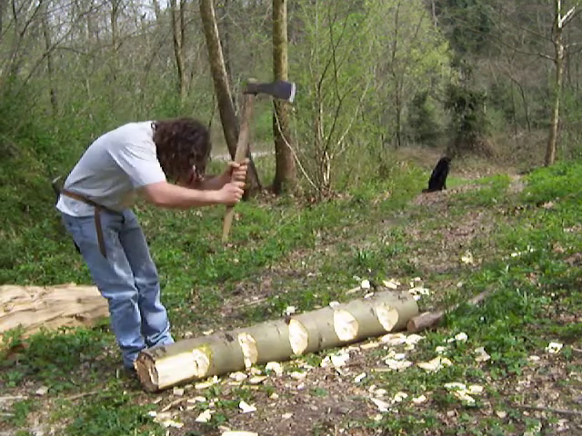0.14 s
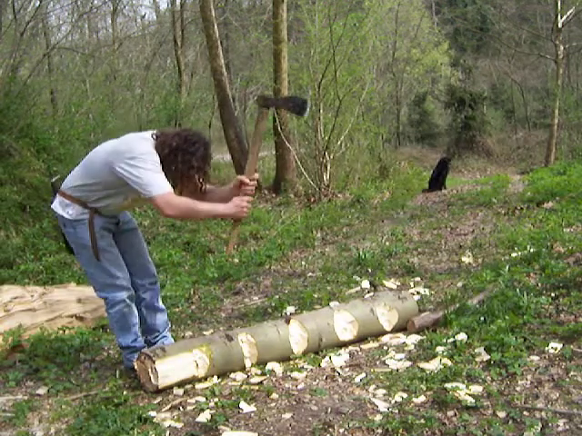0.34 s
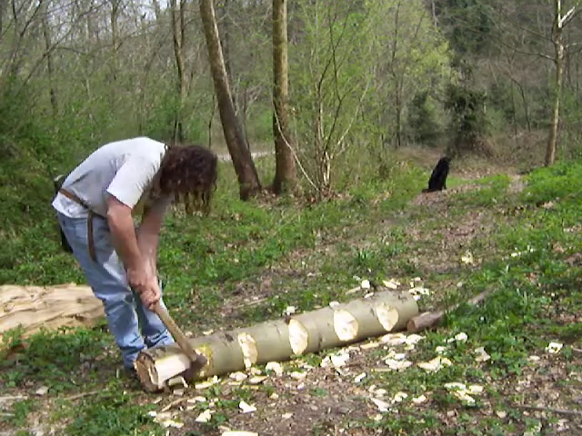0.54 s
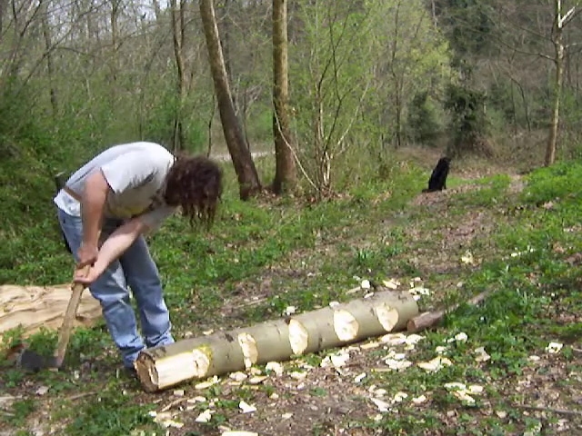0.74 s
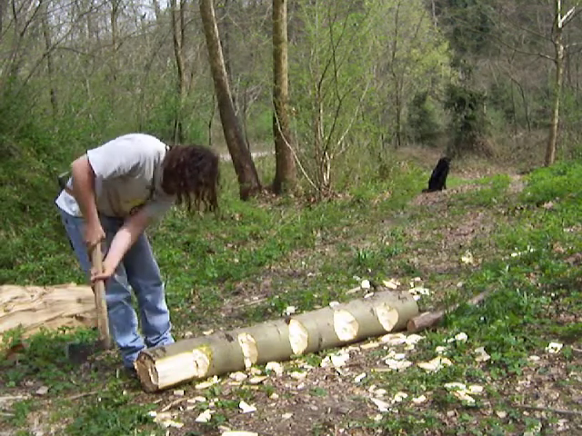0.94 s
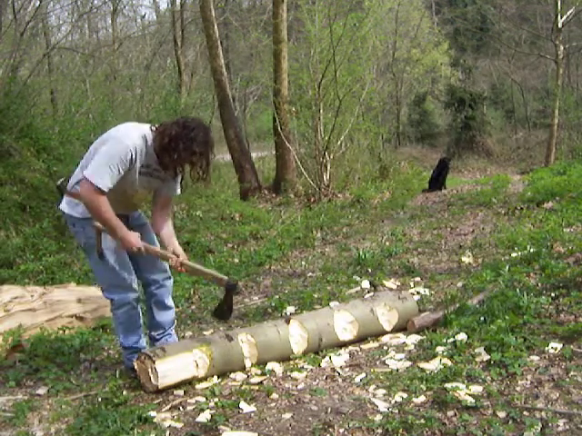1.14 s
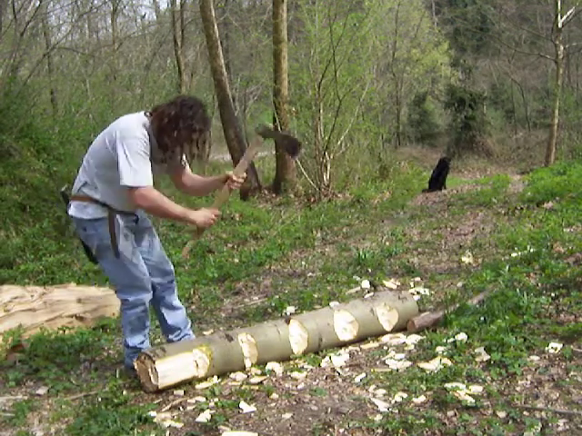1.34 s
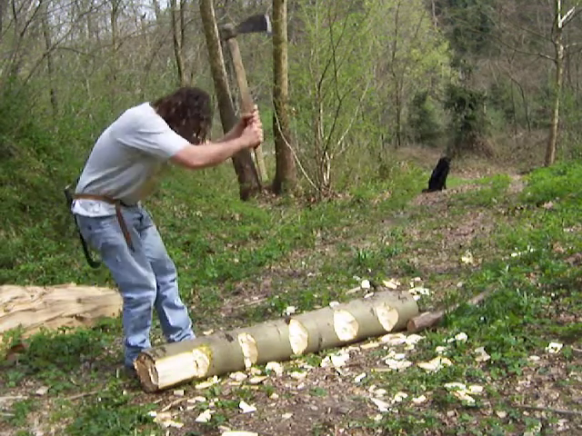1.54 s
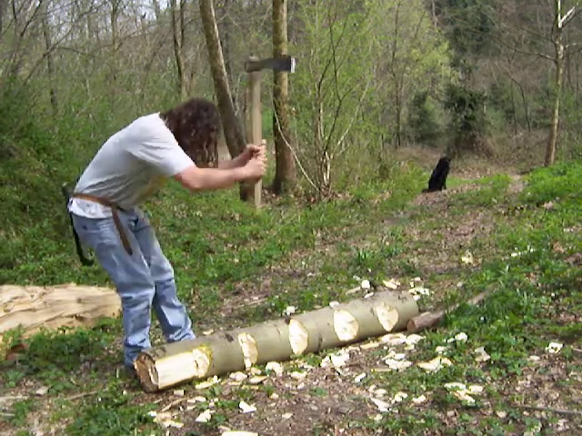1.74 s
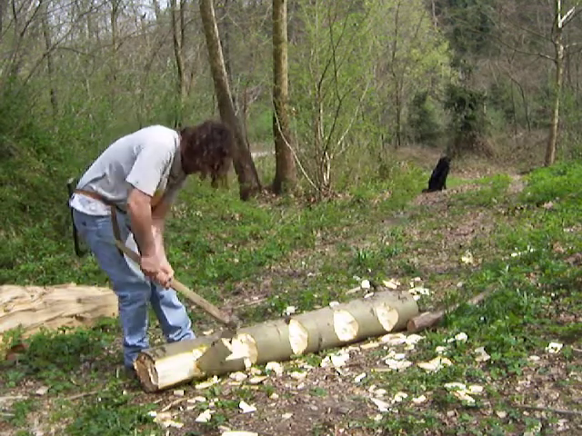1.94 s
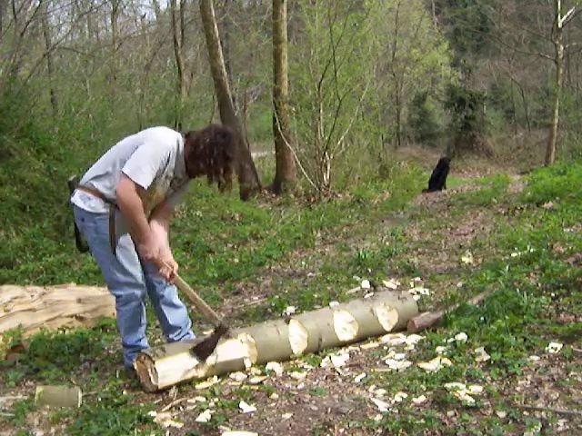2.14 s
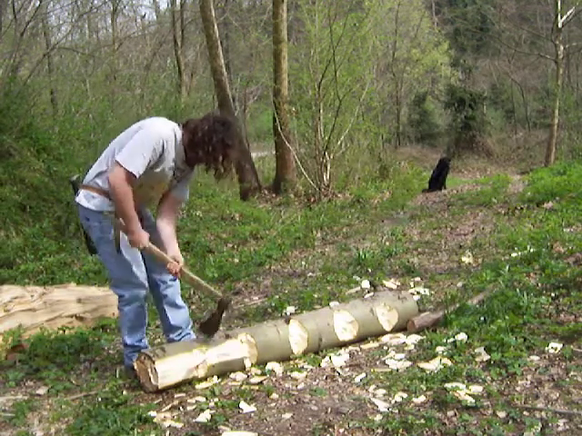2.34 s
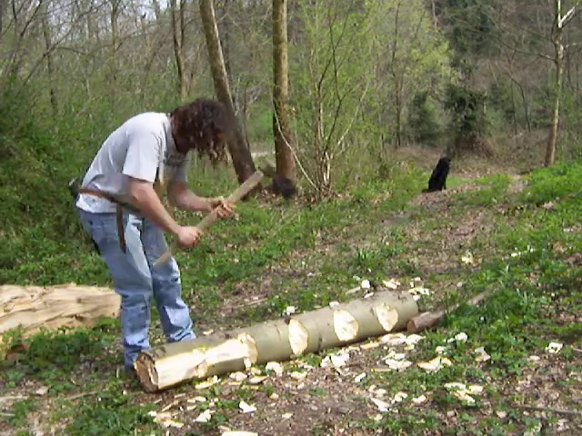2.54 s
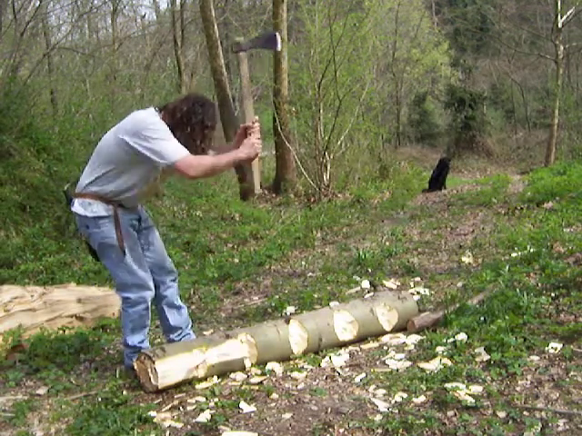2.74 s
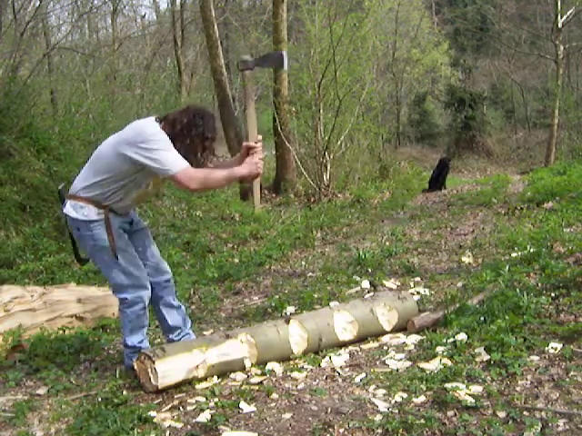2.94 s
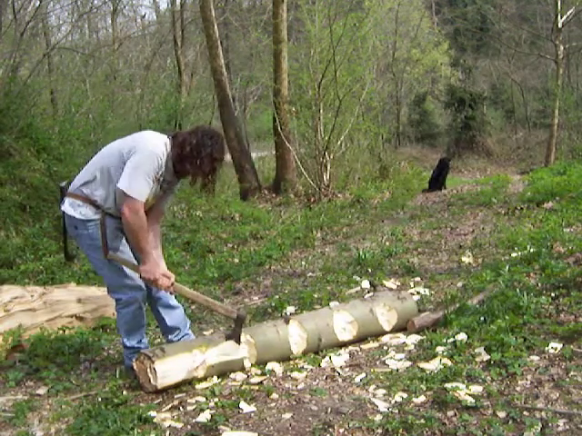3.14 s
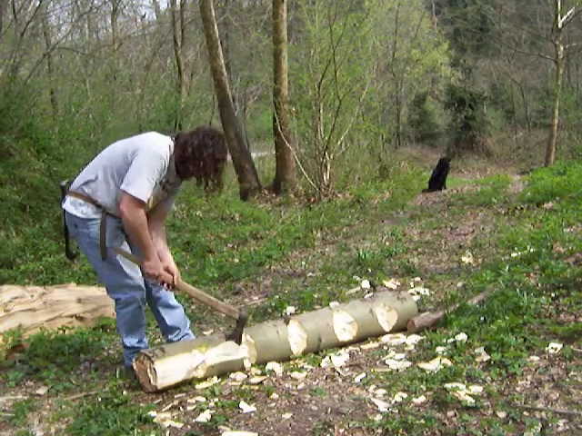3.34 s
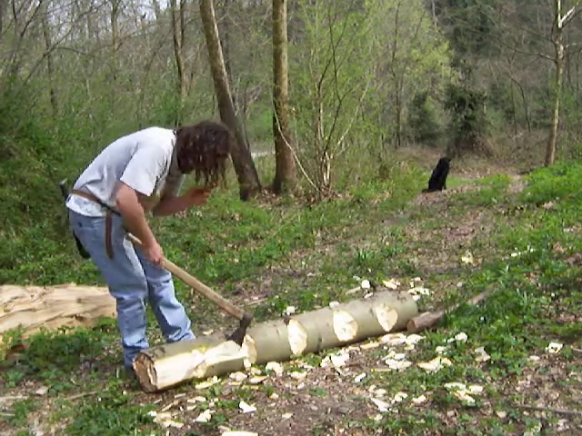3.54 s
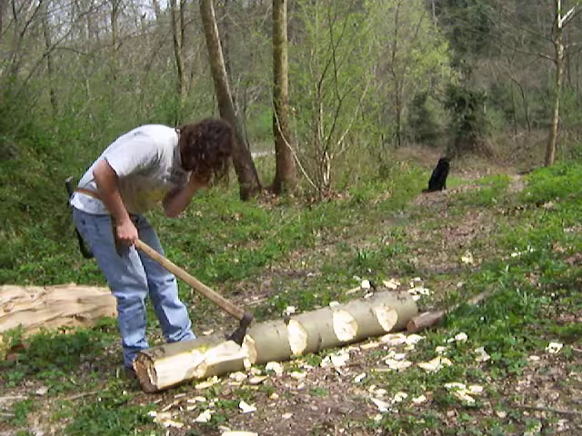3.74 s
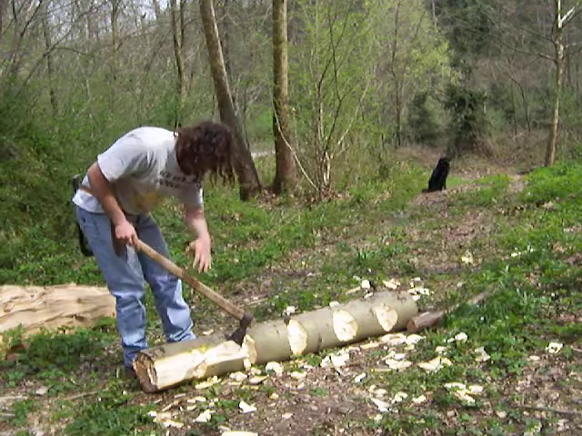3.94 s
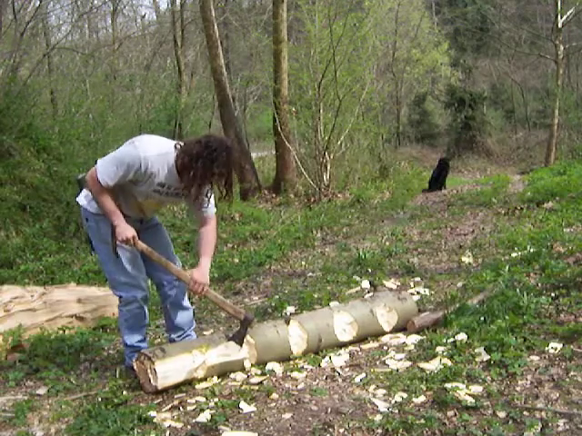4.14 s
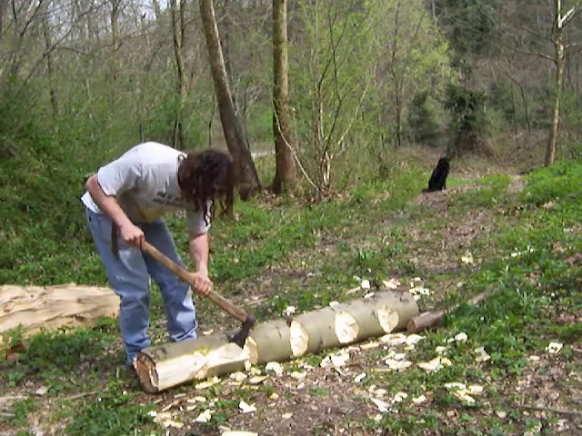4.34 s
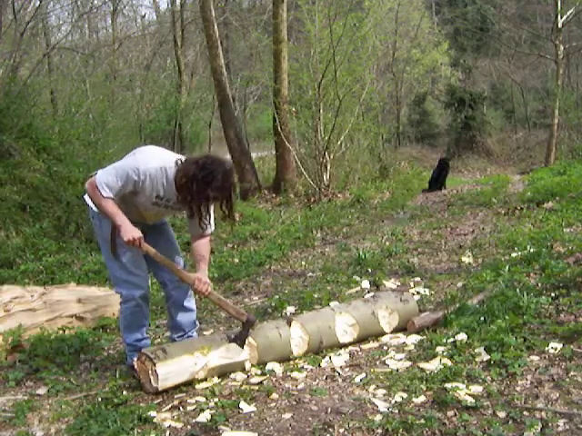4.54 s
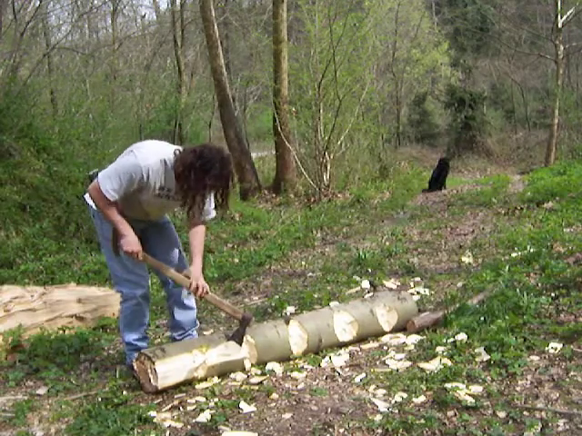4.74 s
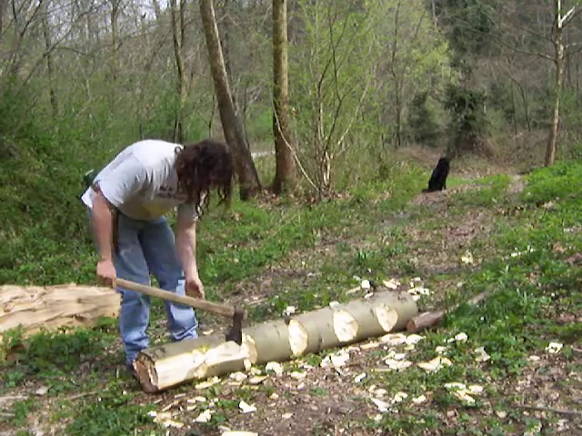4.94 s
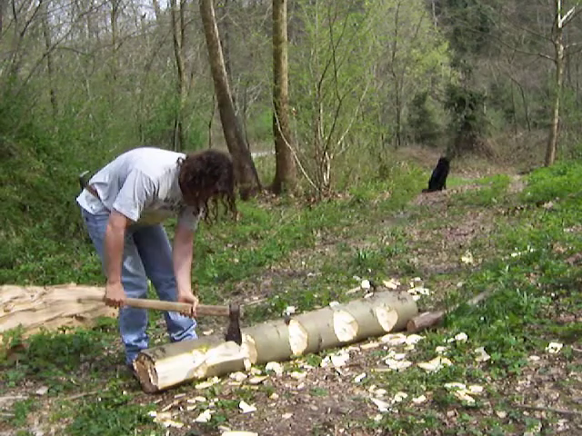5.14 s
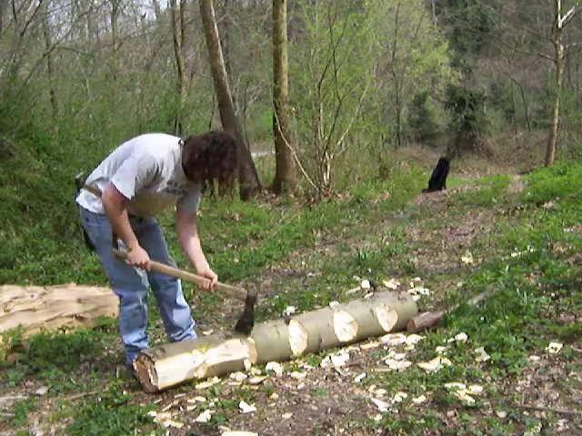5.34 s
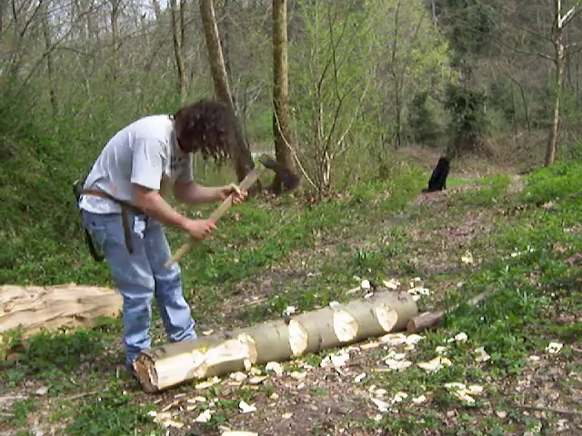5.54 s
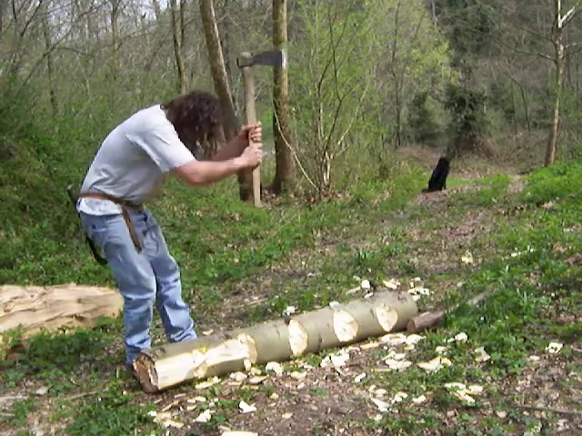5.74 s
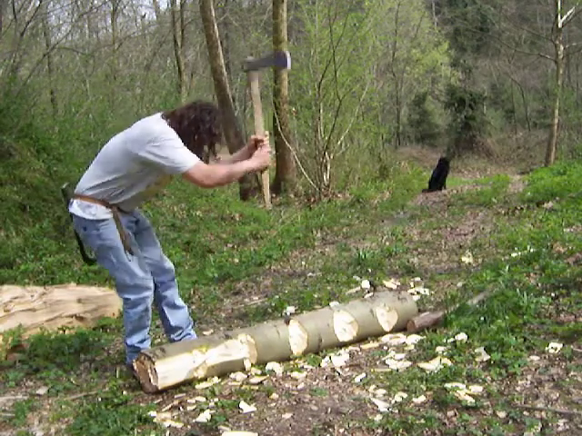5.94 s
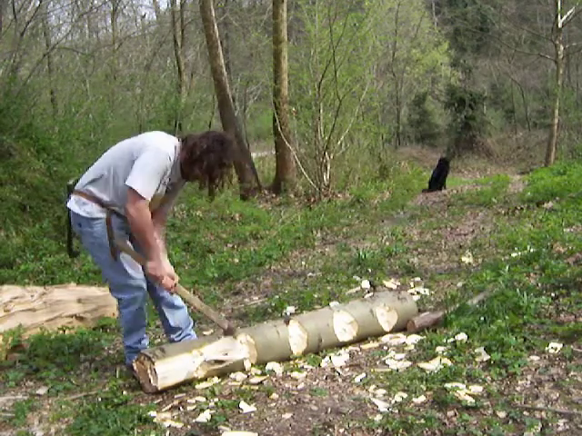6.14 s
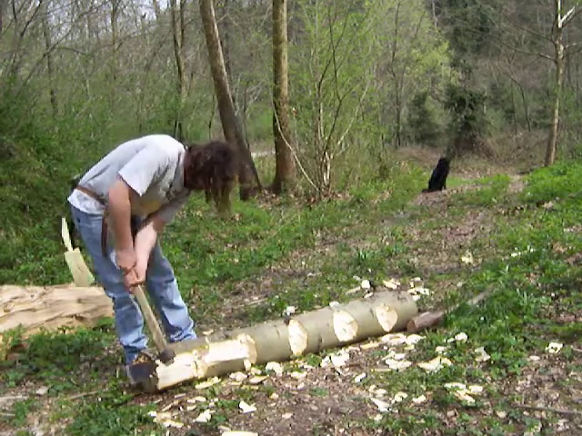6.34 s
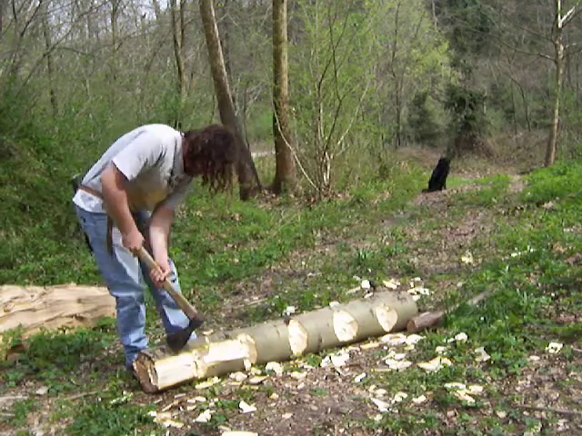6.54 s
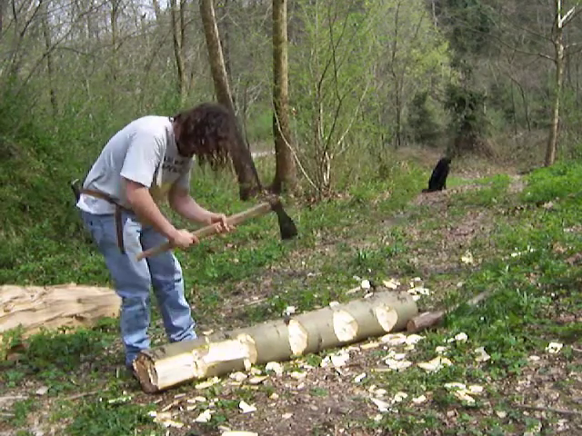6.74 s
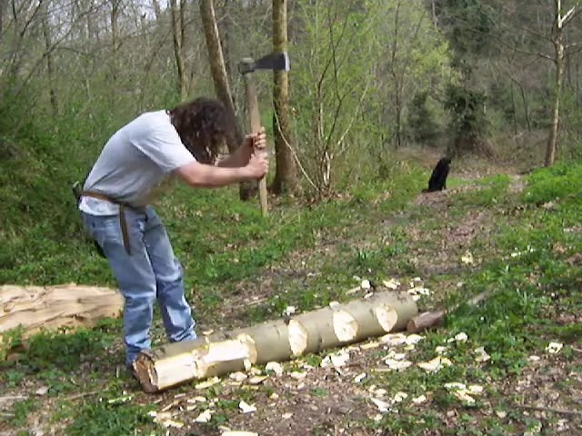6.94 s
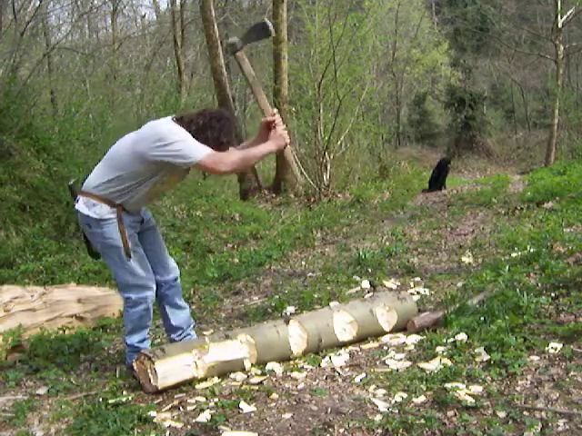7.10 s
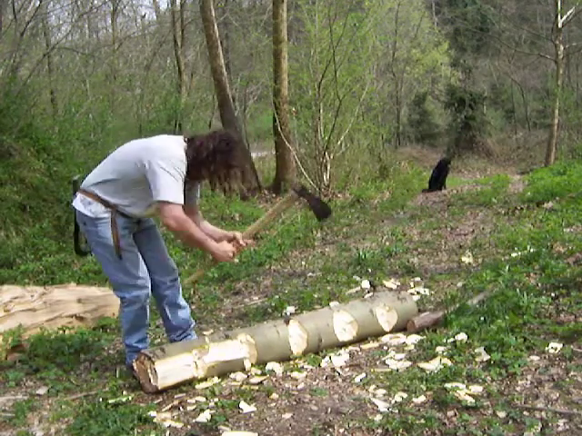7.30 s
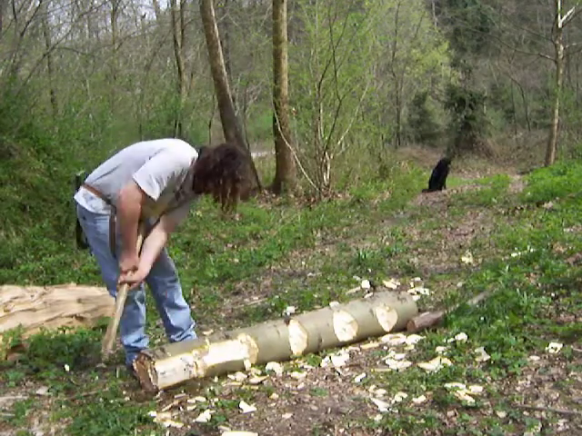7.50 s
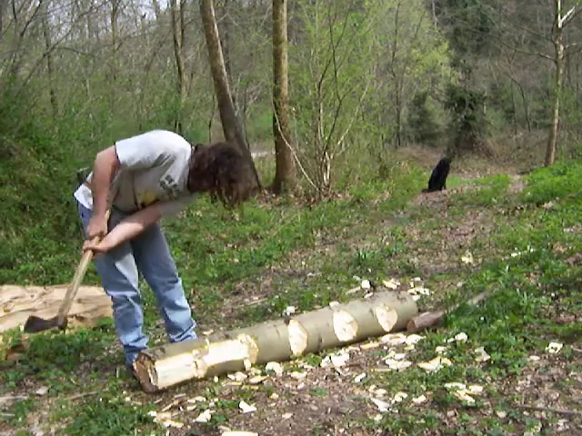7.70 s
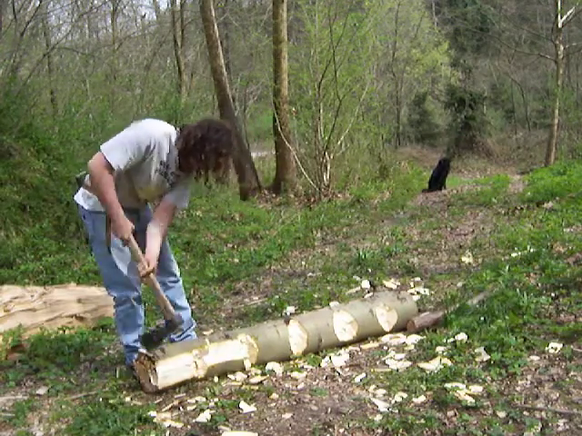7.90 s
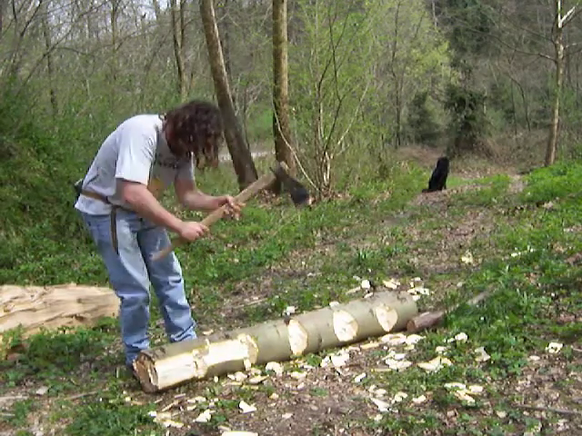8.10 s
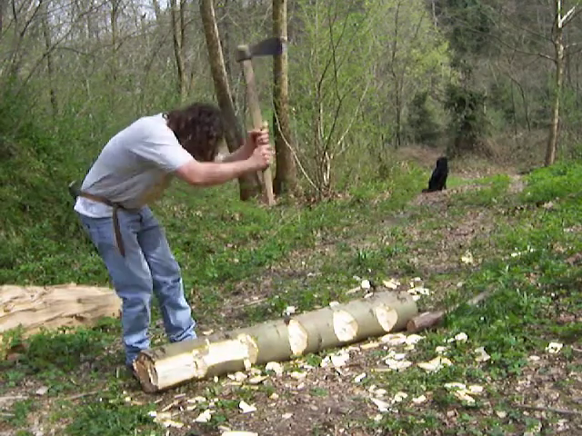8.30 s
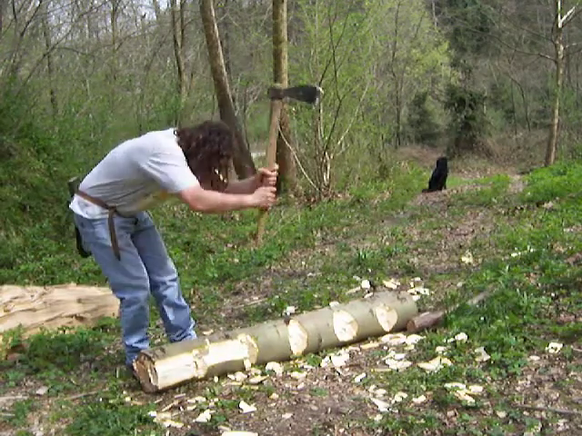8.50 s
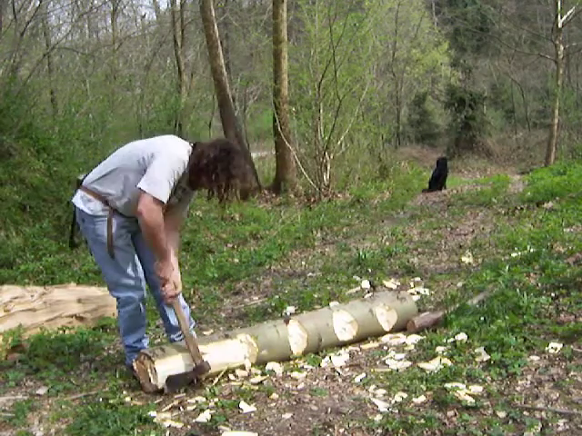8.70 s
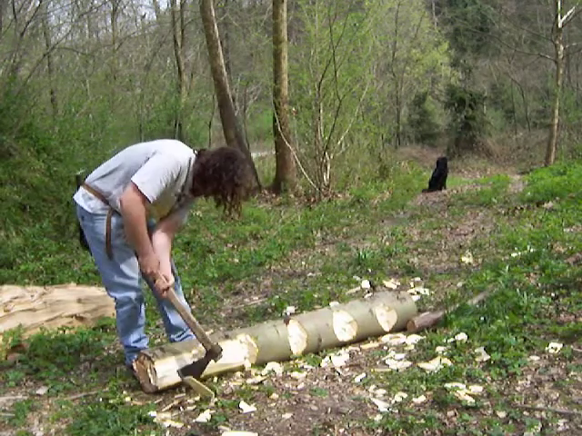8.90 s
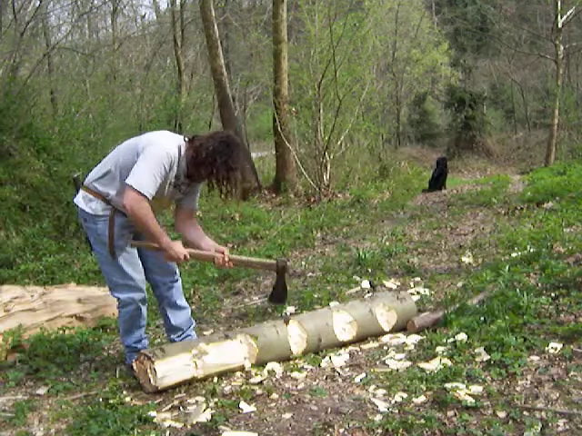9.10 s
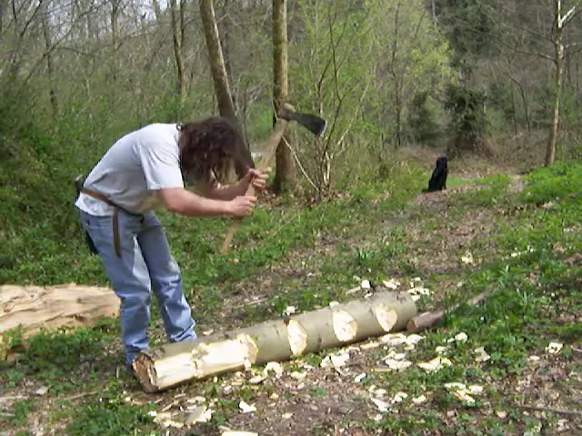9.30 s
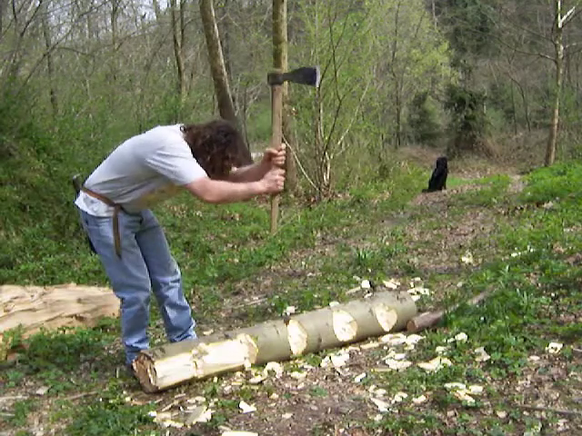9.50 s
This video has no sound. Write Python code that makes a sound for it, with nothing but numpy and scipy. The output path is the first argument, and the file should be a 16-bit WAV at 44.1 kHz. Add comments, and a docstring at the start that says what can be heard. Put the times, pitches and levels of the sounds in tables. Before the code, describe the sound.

Three cracking axe chops into a log, a pause, then three more, with chips falling softly in a quiet wooded clearing.

```python
"""An axe in a wooded clearing

An axe hews a softwood log: six chops, with a pause after the third. Each chop fractures fibres,
excites the log's bending modes and drives it against the soil; chips then fall on leaf litter.
Nearby trunks scatter the sound and far slopes reflect it.
Distant birds whistle over a light breeze and a faint hum."""
import sys
import numpy as np
from scipy import signal
from scipy.fft import rfft, irfft
from scipy.io import wavfile

SR = 44100
rng = np.random.default_rng(int(sys.argv[2]) if len(sys.argv) > 2 else 0)


def to_wav(s):
    """Save 16-bit WAV."""
    ch = np.atleast_2d(s).T  # columns
    pcm = np.round(np.clip(ch, -1, 1) * 32767)  # PCM
    wavfile.write(sys.argv[1], SR, pcm.astype(np.int16))


N = 421596
TIME = np.arange(N) / SR

# one tear through the fibres per chop:
# (time [s], level [dB], length [s], tilt [dB/octave], slab resonance [Hz], resonance lift [dB])
FIBRE_TEARS = [(0.5876, -24, 0.0083, 1.6, 1150, 6.5), (1.9584, -19, 0.0061, -2, 640, 7),
               (3.179, -18.5, 0.0045, -2.3, 760, 7.5), (6.186, -17.5, 0.0044, -.5, 1200, 7.5),
               (7.4284, -25.5, 0.016, -2.7, 530, 10.5), (8.7148, -30, 0.013, 1.7, 1150, 6.5)]
# bundles of fibres giving way at once: (time [s], level [dB], length [s], resonance [Hz])
BUNDLE_SNAPS = [(.6295, -26.5, 0.00098, 6000), (1.9754, -19, 0.0011, 2600), (3.1779, -14, 0.0005, 2400),
                (6.1916, -14, 0.0021, 1250), (6.1928, -14, 0.00051, 6300), (6.195, -25, 0.0037, 2400),
                (7.4407, -11.5, 0.00052, 3800), (7.442, -16, 0.0015, 1870), (8.7086, -15.5, 0.00062, 4800),
                (8.7256, -21.5, 0.0014, 2200), (8.739, -21.5, 0.0012, 1190), (8.7605, -28.5, 0.00069, 6000),
                (8.766, -32, 0.0045, 5300)]
# spectrum of tearing wood: (frequency [Hz], relative density [dB])
FRACTURE_SPECTRUM = [(150, -11), (310, 2.5), (700, 0.5), (1100, -0.5), (1700, -4), (2500, -2), (3300, -3.5),
                     (4300, -1.5), (6300, -7), (7500, -10), (8800, -35.5)]
# blows on the log, rebounds included:
# (time [s], braking time [s], drive of mode 1 [dB], of mode 2 [dB], of the rest [dB], thud level [dB])
LOG_BLOWS = [(.590, 0.0055, -18.5, -17.5, -19, -15), (0.632, 0.00086, -21, -13.5, -20.5, -29),
             (1.959, 0.00085, -22.5, -15.5, -30, -26), (3.183, 0.0018, -27, -17.5, -19, -28),
             (6.189, 0.0033, -30.5, -17, -22, -26.5), (7.431, 0.0029, -19.5, -11, -28, -22),
             (8.7231, .002, -17, -13, -34, -21.5), (8.774, .0023, -35, -41, -28, -38)]
# modes of the log, the two main bending modes first: (frequency [Hz], relative level [dB], t60 [s])
LOG_MODES = [(209.4, 1, 0.36), (465.5, -2.5, 0.17), (320, -1.5, 0.06), (744.7, -2.5, 0.13),
             (815, -16, 0.15), (1010, -11, 0.13), (1355, -16, 0.037), (1810, -23.5, 0.1), (2130, -25, .07)]
# spectrum of the log's thud on the soil: (frequency [Hz], relative density [dB])
THUD_SPECTRUM = [(50, -16), (80, 0), (120, 0), (165, -3.5), (250, 2.5), (350, 0.5), (550, -9.5), (900, -12),
                 (2000, -31), (9000, -55.5)]
# larger chips landing and knocks of the haft: (time [s], level [dB], t60 [s], resonance [Hz])
CHIP_IMPACTS = [(1.315, -55, 0.049, 900), (2.061, -50, 0.028, 3000), (2.490, -46.5, 0.028, 3200),
                (2.781, -44.5, 0.13, 740), (2.844, -54.5, 0.2, 2580), (4.735, -46, 0.029, 2570),
                (5.351, -59.5, 0.065, 3620), (6.238, -34.5, 0.016, 4000), (7.006, -53, 0.076, 4970),
                (7.024, -55, .06, 5000), (7.676, -51, 0.067, 2820), (7.694, -52, 0.16, 4500),
                (8.046, -60, 0.15, 3500), (8.816, -48, 0.023, 6000), (9.082, -38, 0.021, 2290)]
# spectrum of a chip: (frequency [Hz], relative density [dB])
CHIP_SPECTRUM = [(200, -3.5), (600, -4), (1300, 0), (2400, -2.5), (4500, -6), (6500, -6.5), (7600, -8),
                 (8800, -28)]
# scatter from nearby trunks: (frequency [Hz], gain [dB], t60 [s])
TRUNK_SCATTER = [(95.9, -29, .4), (220, -31, .35), (460, -25.5, 0.82), (800, -28, 0.85), (1303, -21, 0.75),
                 (2450, -21, 0.7), (5030, -25.5, 0.35), (8800, -15.5, 0.43)]
# echoes from far slopes: (delay [s], spread [s], relative gain [dB])
SLOPE_ECHOES = [(.22, .045, -41), (.45, 0.15, -43), (0.668, 0.052, -40), (0.882, .04, -50.5)]
# frequency response of those echoes: (frequency [Hz], relative gain [dB])
SLOPE_RESPONSE = [(150, -35), (300, -17.5), (470, 6.5), (750, -18.5), (1300, -13), (2200, -19), (5000, -21)]
# the clearer bird whistles: (time [s], length [s], pitch [Hz], relative level [dB])
BIRD_NOTES = [(.03, 0.21, 3480, -76), (.76, 0.46, 2996, -68.5), (1.144, 0.13, 3600, -64.5),
              (1.45, 0.22, 3860, -69), (1.72, 0.27, 2180, -67), (1.79, 0.14, 3700, -63.5),
              (2.989, .2, 2220, -66.5), (4.375, .2, 2590, -79)]
# course of the breeze: (time [s], relative rumble level [dB], relative leaf level [dB])
BREEZE_LEVELS = [(0, -50, -71), (1.1, -51.5, -66.5), (2.15, -52, -69), (2.37, -47, -71), (2.6, -50, -69.5),
                 (4.601, -51.5, -70.5), (7.1, -58.5, -73), (8.5, -54.5, -72.5), (9.56, -51, -71)]
# spectra of wind rumble, rustling leaves and distant air: (frequency [Hz], relative density [dB])
RUMBLE_SPECTRUM = [(15, 3), (28, 3.5), (45, -1), (70, -9), (120, -26), (250, -27.5)]
LEAF_SPECTRUM = [(600, 5.5), (1500, 2), (2500, 3.5), (4500, 1.5), (6500, 0), (7600, -2), (8800, -24)]
AIR_SPECTRUM = [(40, 1), (80, 0.5), (150, -6.5), (300, -10.5), (500, -13.5), (800, -19.5), (1500, -25),
                (4000, -41)]
# harmonics of the hum: (frequency [Hz], level [dB])
HUM_HARMONICS = [(60, -66.5), (120, -68.5), (180, -73.5), (240, -76), (300, -80.5)]


def splitting(snap_neutral_hz=3600, snap_tilt_db=1.9):
    """Acoustic emission: each chop tears a resonant slab loose, and bundles of fibres snap."""
    out = np.zeros(N)
    for start, db, length, tilt_db, slab_hz, lift_db in FIBRE_TEARS:
        tear = fracture(length, tilt_db)
        add(out, start, from_db(db) * resonate(tear, slab_hz, lift_db, sharpness=2.1))
    for start, db, length, hz in BUNDLE_SNAPS:
        tilt_db = snap_tilt_db * np.log2(hz / snap_neutral_hz)   # thinner fibres snap brighter
        snap = fracture(length, tilt_db)
        add(out, start, from_db(db) * resonate(snap, hz, lift_db=10.5))
    return out


def fracture(length, tilt_db, entry_s=0.0002, splinter_t60=0.12, full_tear_s=0.0025):
    """Crack growth: fibres fail as the blade advances; a longer tear stops more slowly and splinters."""
    t = TIME[:SR // 5]
    entry = 1 - np.exp(-t / entry_s)
    tearing = decay(t - length, t60=0.0018 + 5.5 * length)
    splinter_gain = from_db(-22) * np.sqrt(min(length / full_tear_s, 1))
    splinters = splinter_gain * decay(t - length, splinter_t60)
    return burst(entry * (tearing + splinters), FRACTURE_SPECTRUM, tilt_db, grain_db=5.5)


def log_knocks(thud_t60=0.091, detune=0.002, radiation_hz=170):
    """Modal vibration: the braking blade sets the log ringing in bending and thudding on the soil."""
    ring, thud, t = np.zeros(N), np.zeros(N), TIME[:SR // 2]
    for start, braking_s, first_db, second_db, rest_db, thud_db in LOG_BLOWS:
        push = 1 - np.exp(-t / braking_s)
        for k, (hz, db, t60) in enumerate(LOG_MODES):
            drive_db = (first_db, second_db, rest_db)[min(k, 2)]   # depends on where the blade lands
            pitch = hz * (1 + detune * rng.standard_normal())
            mode = decay(t, t60) * np.sin(2 * np.pi * pitch * t)
            add(ring, start, from_db(db + drive_db) * push * mode)
        impact = burst(push * decay(t, thud_t60), THUD_SPECTRUM, tilt_db=0, grain_db=2.0)
        add(thud, start, from_db(thud_db) * impact)
    # a slim log radiates little below its first mode
    radiation = signal.butter(2, radiation_hz, "high", fs=SR, output="sos")
    return signal.sosfilt(radiation, ring) + thud


def chips(neutral_hz=2900, size_tilt_db=1.5):
    """Impact noise: each chip gives a short dry crackle around its own resonance."""
    out, t = np.zeros(N), TIME[:SR // 5]
    for start, db, t60, hz in list(CHIP_IMPACTS) + spray():
        tilt_db = size_tilt_db * np.log2(hz / neutral_hz)   # smaller chips sound brighter
        crackle = burst(decay(t, t60), CHIP_SPECTRUM, tilt_db, grain_db=6.5)
        add(out, start, from_db(db) * resonate(crackle, hz, lift_db=7.5))
    return out


def spray(count=5, shortest_s=0.077, mean_extra_s=0.09, loudest_db=-55, fade_db_per_s=62.5, t60=0.039):
    """Time of flight: small chips land at random after each chop, the lighter ones later."""
    flights = shortest_s + mean_extra_s * rng.exponential(1, (len(FIBRE_TEARS), count))
    impacts = []
    for (start, *_), thrown in zip(FIBRE_TEARS, flights):
        for flight in np.minimum(thrown, 0.5):
            db = loudest_db - fade_db_per_s * (flight - shortest_s)
            hz = 4800 * 2 ** rng.uniform(-0.5, 0.4)
            impacts.append((start + flight, db, t60, hz))
    return impacts


def clearing_response(build_s=0.0067):
    """Scattering and reflection: trunks return a tail that decays by band, far slopes answer later."""
    t, response = TIME[:SR + SR // 4], 0
    hz, db, t60 = np.transpose(TRUNK_SCATTER)
    edges = np.geomspace(70, 10000, 13)
    for low, high in zip(edges, edges[1:]):
        log_centre = np.log(low * high) / 2
        tail = (1 - np.exp(-t / build_s)) * decay(t, np.interp(log_centre, np.log(hz), t60))
        scatter = rng.standard_normal(len(t)) * tail / np.linalg.norm(tail)
        band = signal.butter(2, [low, high], "band", fs=SR, output="sos")
        response += from_db(np.interp(log_centre, np.log(hz), db)) * signal.sosfilt(band, scatter)
    for delay, spread, echo_db in SLOPE_ECHOES:
        swell = np.exp(-0.5 * ((t - delay) / spread) ** 2)
        echo = rng.standard_normal(len(t)) * swell / np.linalg.norm(swell)
        response += from_db(echo_db) * colour(echo, SLOPE_RESPONSE, keep_power=False)
    return response


def birds(waver=0.014, steady_hz=3420, glide_per_octave=0.17):
    """Frequency modulation: wavering whistles glide up if above steady_hz and down if below it."""
    out = np.zeros(N)
    for start, length, note_hz, db in list(BIRD_NOTES) + chorus():
        samples = int(length * SR)
        knots = rng.standard_normal(40)
        wobble = np.interp(np.linspace(0, 1, samples), np.linspace(0, 1, len(knots)), knots)
        glide = glide_per_octave * np.log2(note_hz / steady_hz) * np.linspace(-0.5, 0.5, samples)
        hz = note_hz * (1 + glide + waver * wobble)
        envelope = 2 * np.sqrt(np.hanning(samples))
        add(out, start, from_db(db) * envelope * np.sin(2 * np.pi * np.cumsum(hz) / SR))
    return out


def chorus(count=14, span_s=2.2, note_s=0.14, low_hz=2650, high_hz=3750, relative_db=-70.5):
    """A jittered sequence: fainter birds take turns at random pitches as the scene opens."""
    return [(span_s * (k + late) / count, note_s, low_hz + height * (high_hz - low_hz), relative_db)
            for k, (late, height) in enumerate(rng.random((count, 2)))]


def breeze(swings_per_s=6, swing_db=3.5, gain_db=1):
    """Turbulence: gusts rumble on the microphone while moving air rustles the leaves."""
    times, rumble_db, leaf_db = np.transpose(BREEZE_LEVELS)
    swings = rng.standard_normal(400)
    gust_db = swing_db * np.interp(TIME * swings_per_s, np.arange(len(swings)), swings)
    rumble = from_db(np.interp(TIME, times, rumble_db) + gust_db) * noise(RUMBLE_SPECTRUM)
    leaves = from_db(np.interp(TIME, times, leaf_db)) * noise(LEAF_SPECTRUM)
    return from_db(gain_db) * (rumble + leaves)


def air_and_hum(air_db=-61):
    """Ambient noise floor: broadband distant air and the harmonic series of a faint hum."""
    hum = sum(from_db(db) * np.sqrt(2) * np.sin(2 * np.pi * (hz * TIME + rng.random()))
              for hz, db in HUM_HARMONICS)
    return from_db(air_db) * noise(AIR_SPECTRUM) + hum


def burst(envelope, spectrum, tilt_db, grain_db):
    """Granular noise: dense pulses of uneven size under an envelope that also sets their energy."""
    sizes = from_db(grain_db * np.clip(rng.standard_normal(len(envelope)), -2, 2))
    grains = rng.standard_normal(len(envelope)) * sizes * envelope
    # flatten the chance peaks of the grains' spectrum before colouring it
    edges = np.geomspace(50, 16000, 15)
    centres = np.sqrt(edges[1:] * edges[:-1])
    bins = (edges * len(grains) / SR).astype(int)
    density = np.add.reduceat(np.abs(rfft(grains)) ** 2, bins)[:-1] / np.diff(bins)
    white = colour(grains, np.column_stack([centres, -10 * np.log10(density)]))
    sound = colour(white, spectrum, tilt_db)
    return sound * np.linalg.norm(envelope) / np.linalg.norm(sound)


def resonate(x, hz, lift_db, sharpness=4.1):
    """Damped resonance: a piece of wood lifts one band, with the total energy held constant."""
    peak = signal.lfilter(*signal.iirpeak(hz, sharpness, fs=SR), x)
    sound = x + (from_db(lift_db) - 1) * peak
    return sound * np.linalg.norm(x) / np.linalg.norm(sound)


def noise(spectrum):
    """Spectral shaping: steady Gaussian noise of unit power."""
    return colour(rng.standard_normal(N), spectrum)


def colour(x, spectrum, tilt_db=0, keep_power=True):
    """Minimum-phase filtering through (frequency [Hz], gain [dB]) points, plus tilt_db per octave."""
    size = 4096
    octave = np.log2(np.maximum(np.fft.rfftfreq(size, 1 / SR), 1))
    hz, db = np.transpose(spectrum)
    octaves_outside = np.maximum(octave - np.log2(hz[-1]), 0) + np.maximum(np.log2(hz[0]) - octave, 0)
    gain = from_db(np.interp(octave, np.log2(hz), db) + tilt_db * (octave - 10) - 20 * octaves_outside)
    # folding the cepstrum onto positive time makes the filter causal
    cepstrum = irfft(np.log(gain))
    cepstrum[1:size // 2] *= 2
    cepstrum[size // 2 + 1:] = 0
    response = irfft(np.exp(rfft(cepstrum)))
    if keep_power:
        response /= np.linalg.norm(response)
    return signal.fftconvolve(x, response)[:len(x)]


def decay(t, t60):
    """Exponential damping: unity until t = 0, then a fall of 60 dB every t60."""
    return np.exp(-np.log(1000) * np.maximum(t, 0) / t60)


def from_db(db):
    """The decibel scale: level to amplitude ratio."""
    return 10 ** (np.asarray(db) / 20)


def add(out, start, sound):
    """Superposition: a sound joins the mix at its start time."""
    at = round(start * SR)
    out[at:at + len(sound)] += sound[:N - at]


def scene(bird_direct_db=-6, bird_echo_db=15, directions=3):
    """Direct and reverberant fields: the near axe is mostly direct, the far birds largely scattered."""
    knocks = log_knocks() + chips()
    song = birds()
    outgoing = knocks + from_db(bird_echo_db) * song
    # the tearing radiates differently in each direction, and each direction has its own trees
    echoes = sum(signal.oaconvolve(outgoing + splitting(), clearing_response())[:N]
                 for _ in range(directions))
    direct = knocks + splitting() + from_db(bird_direct_db) * song
    return (direct + echoes / np.sqrt(directions) + breeze() + air_and_hum())[None]


def record(dry, notch_hz=6970, cutoff_hz=8900):
    """Band limiting: a small microphone with a narrow treble notch and a steep top cut."""
    notched = signal.lfilter(*signal.iirnotch(notch_hz, Q=70, fs=SR), dry)
    top_cut = signal.ellip(10, 0.3, 90, cutoff_hz, fs=SR, output="sos")
    return signal.sosfilt(top_cut, notched)


dry = scene()
out = record(dry)
to_wav(out)
```